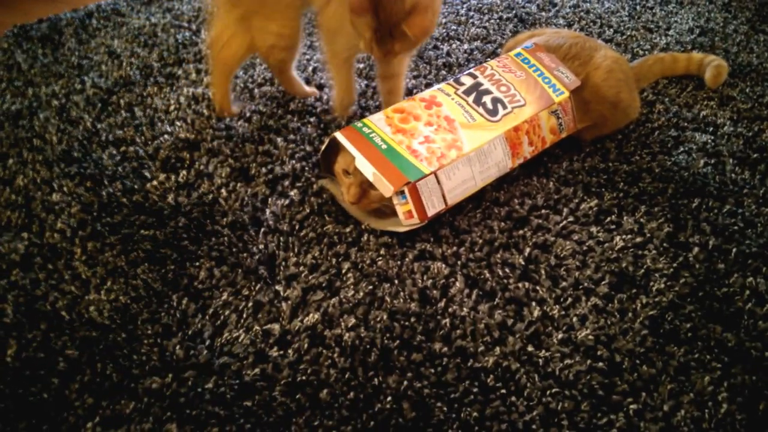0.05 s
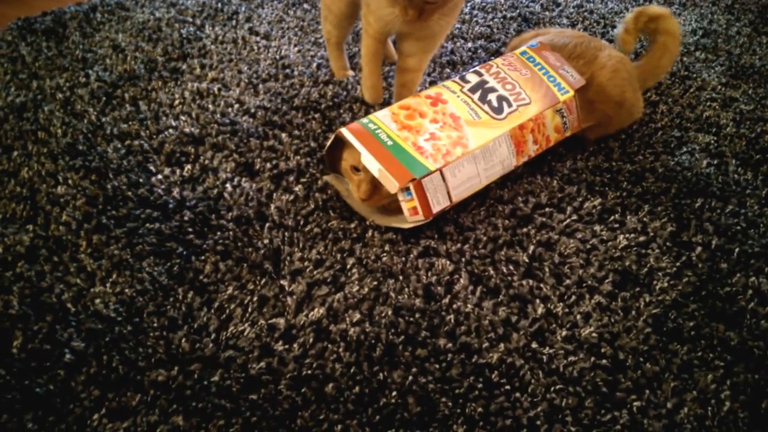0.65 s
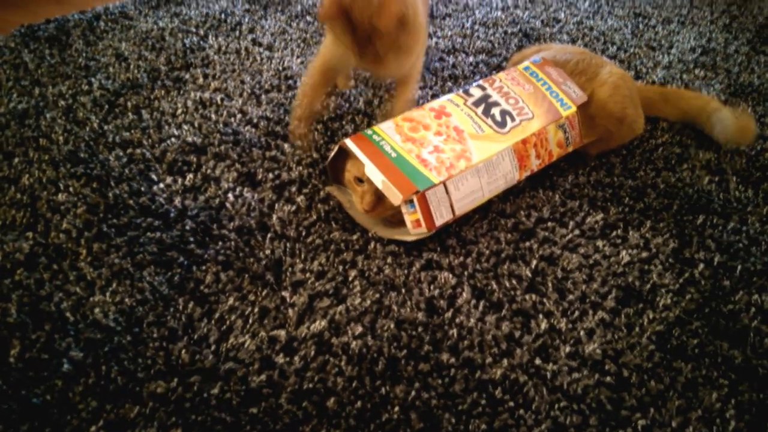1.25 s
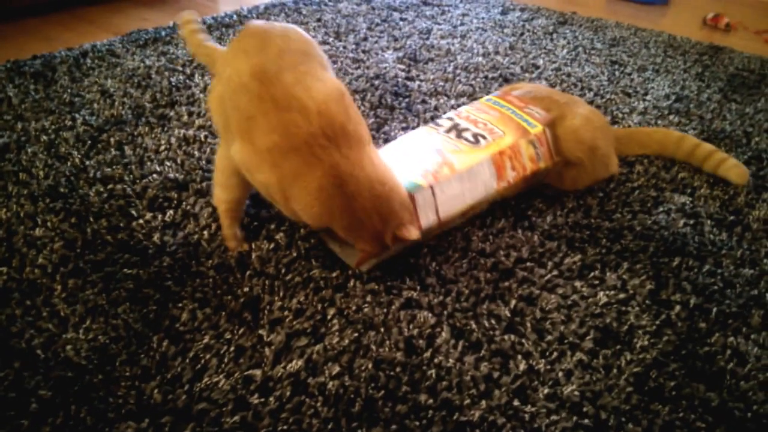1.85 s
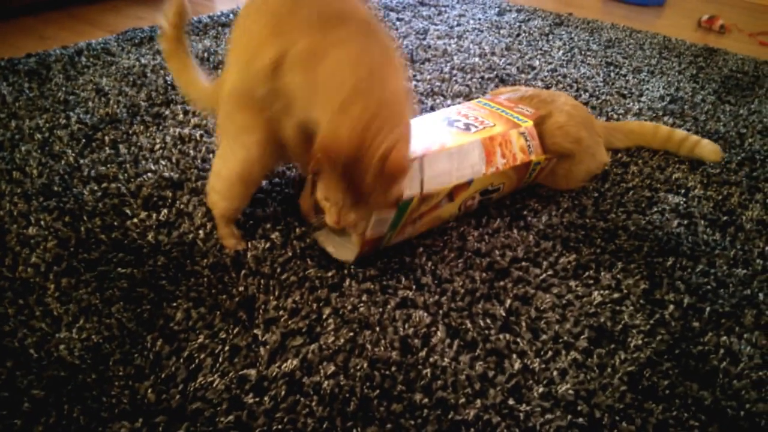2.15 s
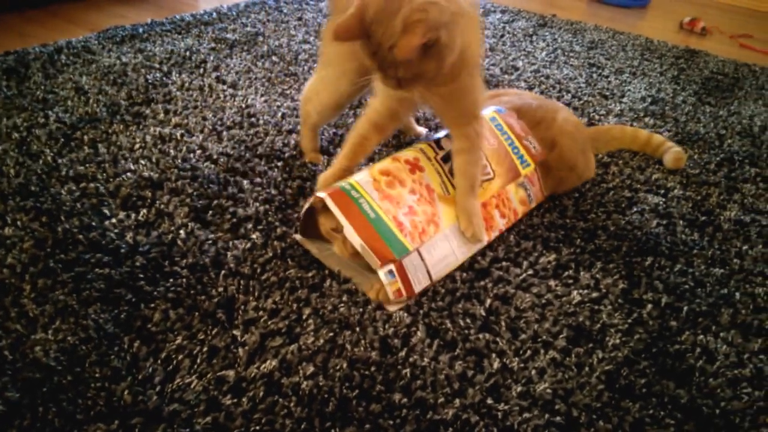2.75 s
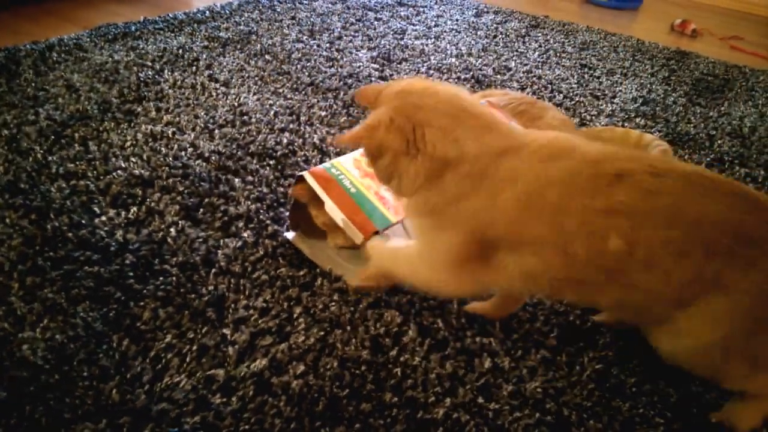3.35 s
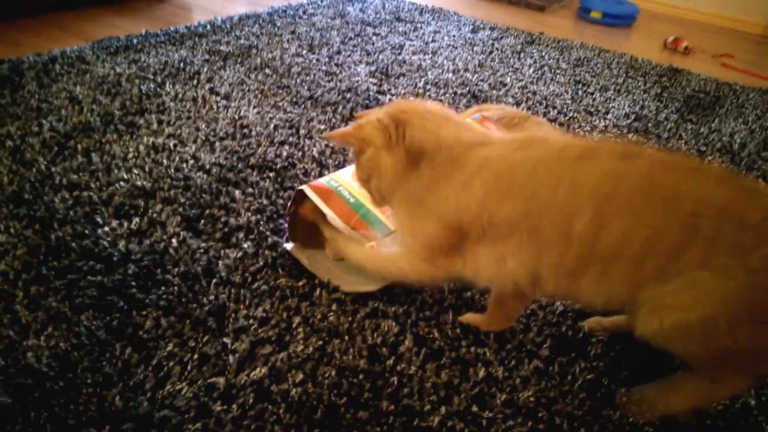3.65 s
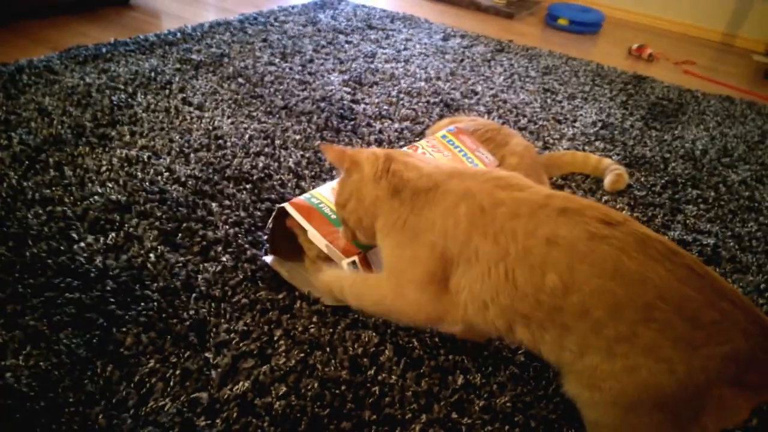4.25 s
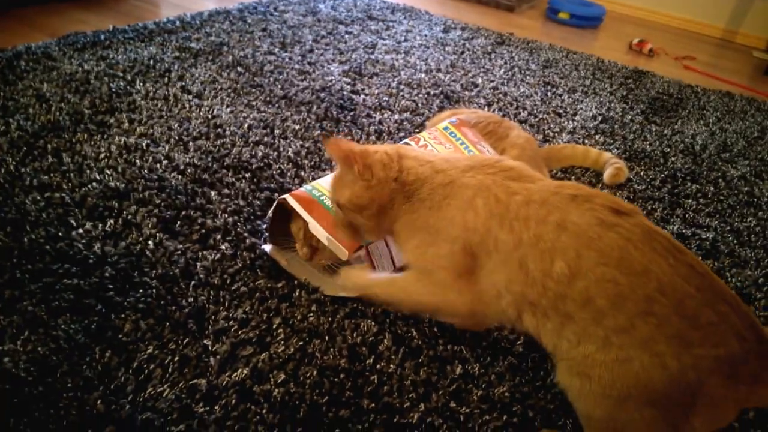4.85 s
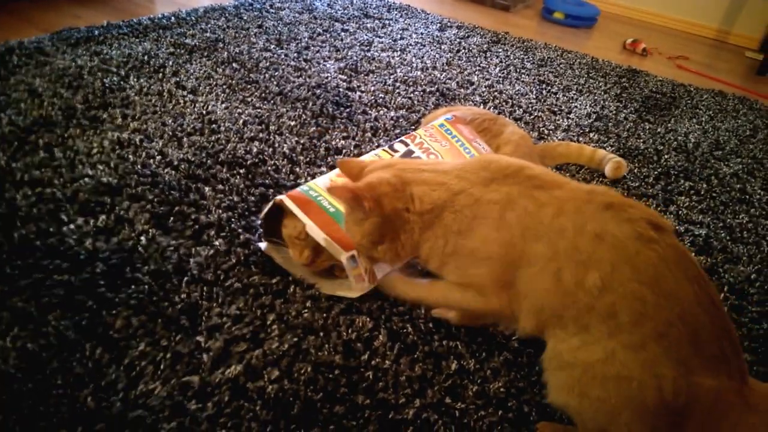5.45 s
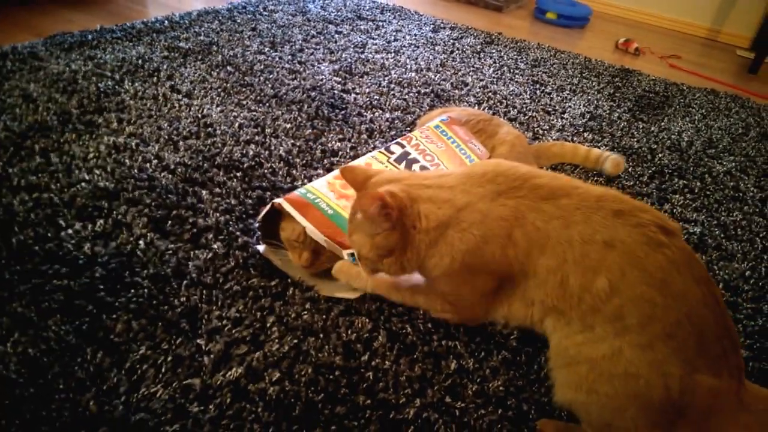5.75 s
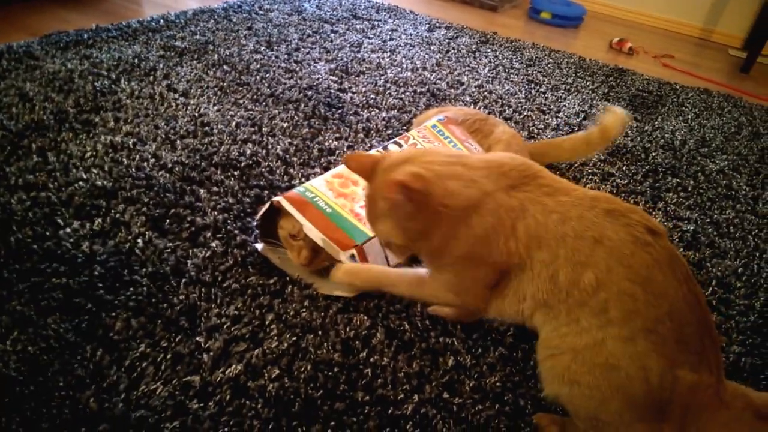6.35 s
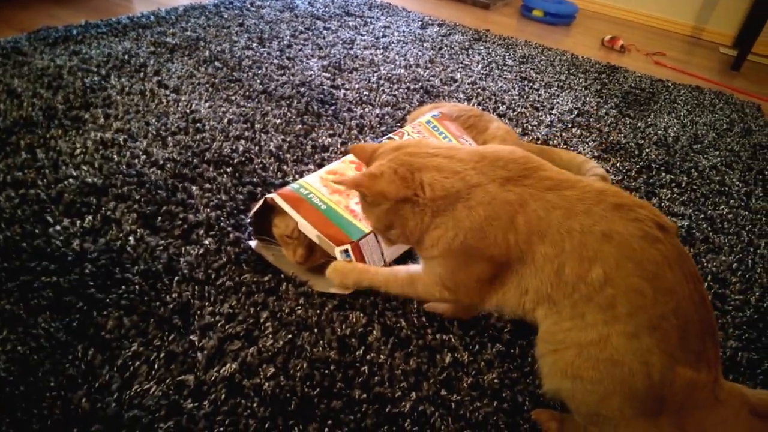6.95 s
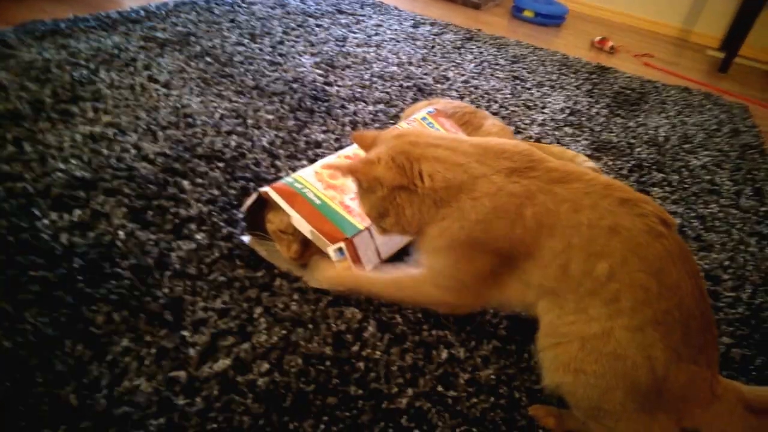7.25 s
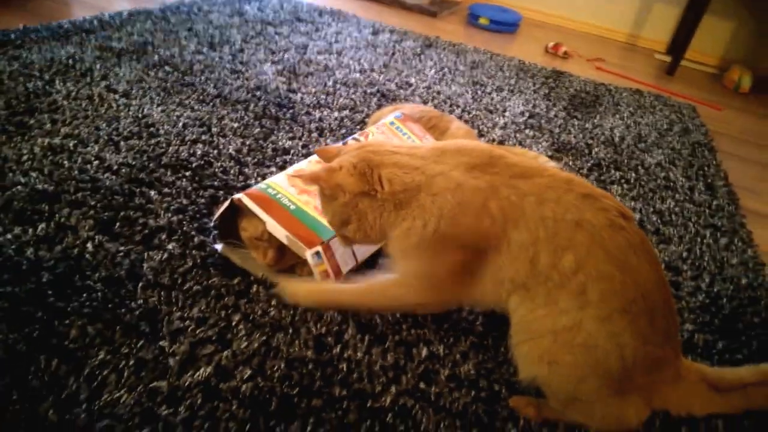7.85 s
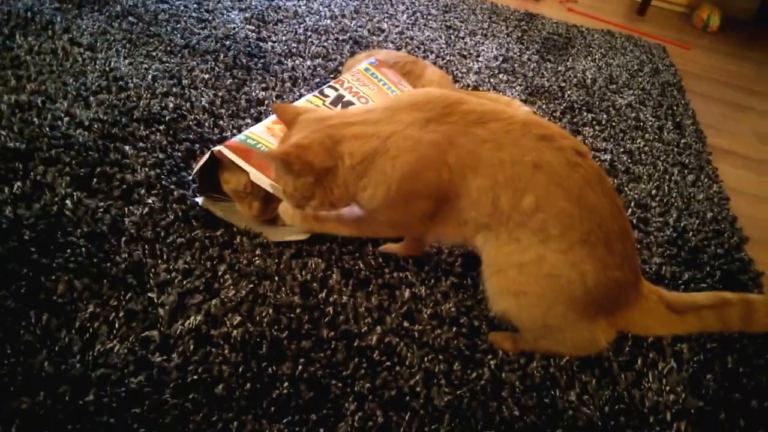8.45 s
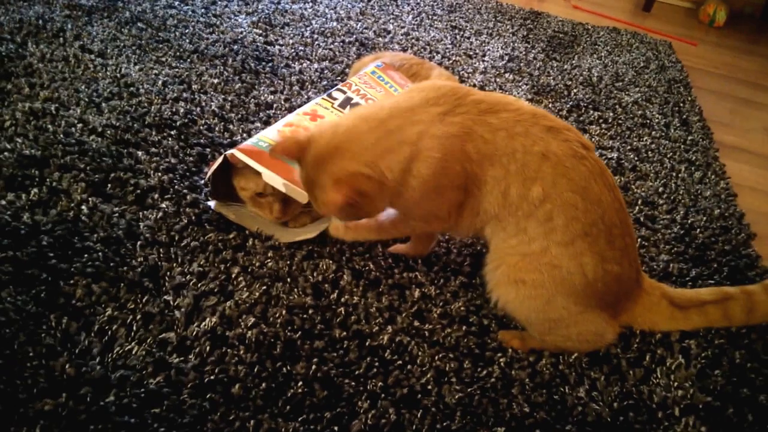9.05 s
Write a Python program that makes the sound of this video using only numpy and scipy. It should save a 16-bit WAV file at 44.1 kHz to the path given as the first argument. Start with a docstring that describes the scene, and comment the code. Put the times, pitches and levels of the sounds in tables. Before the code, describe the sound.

A faint, low appliance hum and a soft hiss of air run throughout in a living room. At about 1.4 seconds a kitten starts pawing a cardboard box, with hollow knocks and small cracks. The strongest come near 1.5 seconds, with a soft thud on the rug, and near 1.9 seconds. Fur brushes and claws scrape the card until about 3.5 seconds, among lighter taps and a sharper knock at 3.2. Around 3.7 to 4.3 seconds comes a flurry of knocks, flap flicks, scratches and soft thuds. The play then thins to separate flicks of the end flap, clearest near 5.6, 6.6 and 7.2 seconds, with faint scratches between. More flicks, a knock and a scrape come around 8 seconds, then light taps near 8.7 and 9.1. The sounds are close, with a short room echo.

```python
"""Two kittens play with a cardboard box on a thick rug in a living room.
Their paws knock and dent the box, so the air inside thumps, the panels ring and the creases crack.
They flick its end flap, scrape and prick the card with their claws, brush it with their fur
and land on the floor with soft thuds. The room adds a short echo.
Underneath, a household appliance hums steadily in a faint hiss of air."""
import sys
import numpy as np
from scipy import signal
from scipy.fft import rfft, irfft, next_fast_len
from scipy.io import wavfile

SR = 44100
rng = np.random.default_rng(int(sys.argv[2]) if len(sys.argv) > 2 else 0)


def wav_out(sig):
    """Save sig, one row per channel (or a flat mono array), as 16-bit PCM at SR to the path in sys.argv[1]."""
    wavfile.write(sys.argv[1], SR, np.round(np.clip(np.atleast_2d(sig).T, -1, 1) * 32767).astype(np.int16))


N = 405279

# Paw blows on the box. Each row: start in seconds, relative levels in dB of the hollow thump,
# the panel ring and the crease crack, number of touches.
PAW_KNOCKS = [(1.386, -39.5, -80, -78, 1), (1.405, -43, -52.5, -59, 2), (1.544, -26.5, -36.5, -40, 1),
              (1.674, -45, -54, -63, 1), (1.7506, -50.5, -48, -57.5, 3), (1.8547, -36.5, -35, -40, 1),
              (2.179, -51.5, -57, -59, 1), (2.3957, -48.5, -52, -60, 1), (2.4538, -58, -54.5, -64, 1),
              (2.5914, -38.5, -50, -56, 1), (2.667, -46.5, -65, -64, 1), (3.1706, -45.5, -37, -56, 1),
              (3.744, -41.5, -58, -61, 1), (3.9534, -39, -43, -47.5, 4), (4.021, -48, -56, -58, 1),
              (4.0711, -50, -55, -68, 1), (4.275, -51.5, -57, -69, 1), (5.3941, -59.5, -56, -80, 1),
              (8.0999, -45.5, -54.5, -66, 1), (8.7039, -56, -50, -66, 1)]
# Flicks of the end flap. Each row: start in seconds, relative level in dB.
FLAP_FLICKS = [(2.592, -54.5), (3.7441, -41.5), (3.8381, -55), (3.979, -40.5), (4.2522, -54),
               (4.3685, -55.5), (5.1295, -47.5), (5.3206, -56), (5.577, -39), (5.7626, -50.5),
               (6.605, -45.5), (6.7858, -56), (7.1794, -40.5), (7.3643, -55.5), (7.858, -43),
               (7.988, -46.5), (9.0875, -55)]
# Single claw strokes. Each row: middle in seconds, length in seconds, relative level in dB, pitch in Hz.
CLAW_STROKES = [(1.574, .047, -52.5, 3900), (1.747, .018, -50.5, 1807), (2.401, .049, -60, 1790),
                (2.84, .049, -67.5, 2440), (2.881, .045, -61.5, 2330), (2.992, .037, -58, 2380),
                (3.976, .077, -49, 2120), (4.291, .084, -60.5, 1930), (4.617, .32, -74.5, 1960),
                (5.03, .086, -66.5, 6500), (5.395, .028, -55, 1660), (6.58, .035, -64, 6500),
                (7.144, .12, -67.5, 1700), (7.684, .016, -57.5, 7040), (8.1, .28, -61.5, 1680),
                (8.514, .21, -71.5, 1910), (8.707, .022, -53, 1570)]
# Rubbing as a kitten climbs over the box. Each row: time in seconds, claw level in dB, fur level in dB.
CLIMB_LEVELS = [(.7, -98, -100), (1.03, -74, -97), (1.38, -89, -82), (1.41, -73, -55.5), (1.53, -84, -70),
                (1.67, -60, -61), (1.82, -64.5, -67), (2.03, -88, -75), (2.17, -76, -62.5),
                (2.27, -74, -67), (2.42, -68, -62.5), (2.6, -74, -65), (2.93, -76, -77), (3.1, -81, -78),
                (3.38, -77, -65), (3.7, -89, -85)]
# Claw tips pricking the card. Each row: start in seconds, relative level in dB.
CLAW_PRICKS = [(1.418, -64), (1.544, -63), (1.8545, -49), (3.9535, -56), (8.0996, -69)]
# A kitten landing on the rug. Each row: start in seconds, relative level in dB.
LANDINGS = [(1.544, -40.5), (3.038, -51), (3.961, -40), (3.982, -41.5), (8.10, -50.5)]

# The ways each part rings, called modes. Each row: pitch in Hz, width in Hz, relative level in dB.
HOLLOW_MODES = [(235, 170, 1.5), (350, 260, -1), (530, 260, -8)]  # the air in the box
PANEL_MODES = [(700, 400, -7), (1200, 450, -1), (1650, 520, 0), (2150, 700, 0), (2800, 900, -7)]
CREASE_MODES = [(3580, 910, 4), (5230, 2100, 5), (8450, 3800, -8)]
FLAP_MODES = [(310, 260, -4), (760, 200, -6), (1250, 260, -12), (1620, 280, -10), (2010, 260, -5),
              (2200, 520, 0), (2900, 600, -16), (3500, 800, -14)]
SNAP_MODES = [(4960, 1200, -25), (6450, 1600, 7)]  # a claw leaving the flap
ALL_ROUND_MODES = [(280, 260, 0), (720, 550, -3), (1350, 900, -1), (2150, 1400, 0), (3500, 2200, -3)]  # the card's modes from all directions, merged into broad humps
CLAW_TIP_MODES = [(10800, 1300, -6), (13300, 1800, -3)]  # a claw tip on the card's coating
FLOOR_MODES = [(149, 91, 0)]  # the floor under the rug

# Tone colours of fur, room echo and air. Each row: frequency in Hz, relative level in dB.
FUR_SPECTRUM = [(100, -27), (300, 9), (700, 7), (2000, 4), (5500, 0), (9000, -6), (13000, -9), (16000, -10)]
ECHO_SPECTRUM = [(100, 9), (240, 2), (600, 0.5), (1100, 0.5), (2000, -3.5), (3800, -4.5), (6000, -3.5),
                 (9000, -1), (14000, -10)]
AIR_SPECTRUM = [(25, -4), (50, -4), (100, 7.5), (170, 3), (280, 4), (450, -2.5), (700, -7), (1000, -7.5),
                (1200, -4), (1500, -7), (2200, -7.5), (3700, -10), (5200, -17), (10000, -20.5),
                (16000, -22.5)]
# How long the echo lasts. Each row: frequency in Hz, seconds to fade by 60 dB.
ECHO_FADE = [(150, .27), (500, .3), (1400, .26), (3700, .28), (9000, .2), (15000, .16)]
# Sound arriving from all sides. Each row: frequency in Hz, likeness of left and right (1 is identical).
STEREO_LIKENESS = [(100, 0.68), (300, 0.75), (640, 0.6), (1400, 0), (3000, 0), (16000, 0.063)]
# Left-right tilts. Each row: frequency in Hz, left minus right in dB.
BOX_TILT = [(200, 1.5), (700, -1.5), (1500, -3.5), (4500, 4.5), (8000, 5.5), (13000, 16)]  # sound coming straight from the box
MICROPHONE_TILT = [(60, -3.5), (700, -3.5), (1300, -3), (2400, -4.5), (4400, -6.5), (8000, -2.5),
                   (15000, -3.5)]  # sensitivity of the two microphones

TOUCH_GAP_S, TOUCH_LOSS_DB = .0108, 5.5  # a fumbling paw touches again, softer than it first hit
# Fur level at a typical stroke, and the share of a stroke's extra dB that the fur follows.
TYPICAL_STROKE_DB, STROKE_FUR_DB, FUR_FOLLOWS = -55.5, -59, 0.57
MOTOR_HZ, MAINS_HUM_HZ = 59.695, 119.98
MOTOR_DB, MAINS_HUM_DB = -54, -55
# Fainter appliance tones. Each row: pitch in Hz, level in dB.
APPLIANCE_WHINES = [(179.2, -74), (240, -88), (269.2, -76), (414, -79), (469, -80.5), (538.2, -74),
                    (1120, -82), (2148, -83.5), (2628, -90), (4177, -99), (4297, -88.5)]


def paw_knocks():
    """Paws thump the box's air, ring its panels and crack creases. Gives direct and wall-bound sound."""
    touches = [(s + k * TOUCH_GAP_S, *(np.array(levels_db) - TOUCH_LOSS_DB * (k > 0)))
               for s, *levels_db, count in PAW_KNOCKS for k in range(round(count))]
    starts, thump_db, panel_db, crack_db = np.transpose(touches)
    thumps = blows(zip(starts, thump_db), HOLLOW_MODES, buckle=.066, buckle_s=.0027, gain_db=-.5)
    cracks = blows(zip(starts, crack_db), CREASE_MODES, buckle=.2, buckle_s=.004, gain_db=-.5)
    panels = blows(zip(starts, panel_db), PANEL_MODES, buckle=.045, buckle_s=.004)
    spread = blows(zip(starts, panel_db), ALL_ROUND_MODES, buckle=.071, buckle_s=.0047)
    return thumps + cracks + panels, from_db(-5) * (thumps + cracks) + spread


def flap_flicks():
    """The flap snaps off a claw and springs back. Gives direct and wall-bound sound."""
    swing = blows(FLAP_FLICKS, FLAP_MODES, buckle=.032, buckle_s=.012)
    snap = blows(FLAP_FLICKS, SNAP_MODES, buckle=.12, buckle_s=.0016, gain_db=-17)
    spread = blows(FLAP_FLICKS, ALL_ROUND_MODES, buckle=.06, buckle_s=.0063, gain_db=-4)
    return swing + snap, spread + from_db(-6.5) * swing + from_db(-6) * snap


def blows(rows, modes, buckle, buckle_s, gain_db=0):
    """Each blow rings the modes with a push, then tiny fading slips as the surface buckles."""
    track = np.zeros(N)
    t = np.arange(2048) / SR
    for start, db in rows:
        force = (t == 0) + buckle * rng.standard_normal(len(t)) * np.exp(-t / buckle_s)
        spot_db = rng.standard_normal(len(modes))  # each spot rings a little differently
        ring = sum((-1) ** k * from_db(mode_db + spot_db[k]) * soft_ring(force, hz, width)
                   for k, (hz, width, mode_db) in enumerate(modes))
        attack_level = np.sqrt(np.mean(ring[t < .006] ** 2))
        add(track, start, from_db(db + gain_db) * ring / attack_level)
    return track


def soft_ring(x, hz, width):
    """Soft card takes a moment to get moving, so the resonance acts twice."""
    return resonate(resonate(x, hz, width), hz, width)


def resonate(x, hz, width):
    """One resonance: it passes its own pitch at full strength and weakens the rest."""
    r = np.exp(-np.pi * width / SR)
    feedback = [1, -2 * r * np.cos(2 * np.pi * hz / SR), r * r]
    return signal.lfilter(np.array([1, 0, -1]) * (1 - r * r) / 2, feedback, x)


def claws_and_fur(slips_per_s, uneven_db, rubbing_hz):
    """Claws stick and slip over the card, in long rubbing and single strokes; fur adds a fine hiss."""
    slips = (rng.random(N) < slips_per_s / SR) * rng.standard_normal(N)
    slips *= from_db(uneven_db * drift(per_s=150))
    claw_gain, fur_gain = climbing_gains()
    scrape = claw_gain * rasp(slips, rubbing_hz)
    for middle, length, db, hz in CLAW_STROKES:
        start = max(middle - length / 2, 0)
        swell = np.hanning(int(length * SR))
        grains = slips[int(start * SR):][:len(swell)]
        add(scrape, start, from_db(db) * swell[:len(grains)] * rasp(grains, hz))
        add(fur_gain, start, from_db(STROKE_FUR_DB + FUR_FOLLOWS * (db - TYPICAL_STROKE_DB)) * swell)
    fur_hiss = unit_level(coloured(rng.standard_normal(N) + 5 * slips, FUR_SPECTRUM))
    return scrape + fur_gain * fur_hiss


def climbing_gains():
    """How strongly claws and fur rub while a kitten climbs on the box; zero before and after."""
    times, *levels_db = np.transpose(CLIMB_LEVELS)
    t = np.arange(N) / SR
    return [from_db(np.interp(t, times, db)) * (t > times[0]) * (t < times[-1]) for db in levels_db]


def rasp(slips, hz):
    """Slips ring the card under the claw and, faintly, the hollow of the box."""
    return unit_level(soft_ring(slips, hz, width=hz / 2) + .12 * resonate(slips, hz=540, width=460))


def claw_pricks():
    """Claw tips prick the coated card with tiny, high ticks."""
    return blows(CLAW_PRICKS, CLAW_TIP_MODES, buckle=.13, buckle_s=.0013, gain_db=2.5)


def floor_thuds():
    """A kitten's weight lands on the rug and shakes the floor under it."""
    return blows(LANDINGS, FLOOR_MODES, buckle=.0076, buckle_s=.0015)


def room_echo(x, gain_db, build_s):
    """Walls and furniture send back a blur of echoes that dies away band by band."""
    t = np.arange(SR // 2) / SR
    edges_hz = np.geomspace(80, 16000, 22)
    tail = 0
    for low, high in zip(edges_hz, edges_hz[1:]):
        hz = np.sqrt(low * high)
        band_pass = signal.butter(2, [low, high], "band", fs=SR, output="sos")
        band = signal.sosfilt(band_pass, diffuse_noise(SR))[:, -len(t):]
        fade = from_db(-60 * t / at_hz(ECHO_FADE, hz))
        band = unit_level(band * fade * (1 - np.exp(-t / build_s)))
        width_gain = np.sqrt(2 * (high - low) / SR / len(t))  # wider bands carry more energy
        tail = tail + band * from_db(at_hz(ECHO_SPECTRUM, hz)) * width_gain
    return from_db(gain_db) * signal.fftconvolve(x[None], tail, axes=1)[:, :N]


def appliance():
    """The motor runs just under mains speed, beside the magnetic hum and some faint whines."""
    hum = tone(MOTOR_HZ, MOTOR_DB, waver=.02) + tone(MAINS_HUM_HZ, MAINS_HUM_DB, waver=.044)
    return hum + sum(tone(hz, db, waver=.44) for hz, db in APPLIANCE_WHINES)


def tone(hz, db, waver):
    """A steady tone whose phase wanders by about `waver` radians."""
    phase = 2 * np.pi * (hz * np.arange(N) / SR + rng.random())
    return np.sqrt(2) * from_db(db) * np.sin(phase + waver * drift(per_s=4))


def still_air():
    """A faint, low hiss comes from all around the room."""
    noise = diffuse_noise(next_fast_len(N))[:, :N]
    return from_db(-61.5) * unit_level(coloured(noise, AIR_SPECTRUM))


def diffuse_noise(size):
    """White noise from all sides: left and right are alike only for long, low waves."""
    mid, side = rfft(rng.standard_normal((2, size)))
    alike = at_hz(STEREO_LIKENESS, np.arange(len(mid)) * SR / size)
    return irfft(np.sqrt((1 + alike) / 2) * mid + np.sqrt((1 - alike) / 2) * side * [[1], [-1]], size)


def placed(x, lead_ms):
    """Direct sound reaches the left microphone a little earlier."""
    return np.array([x, np.roll(x, round(lead_ms * SR / 1000))])


def tilted(pair, tilt):
    """Give half of a left-right tilt to the left side and the opposite half to the right."""
    return np.array([coloured(pair[0], tilt, share=.5), coloured(pair[1], tilt, share=-.5)])


def coloured(x, spectrum, share=1):
    """Turn each frequency up or down by a share of the table's dB."""
    size = next_fast_len(x.shape[-1] + 2048)
    hz = np.arange(size // 2 + 1) * SR / size
    return irfft(rfft(x, size) * from_db(share * at_hz(spectrum, hz)), size)[..., :x.shape[-1]]


def drift(per_s):
    """A random wander of about size 1, gliding to a new value per_s times a second."""
    values = rng.standard_normal(int(N / SR * per_s) + 2)
    return unit_level(np.interp(np.arange(N) / SR * per_s, np.arange(len(values)), values))


def add(track, start_s, sound):
    """Mix a sound into the track at its start time."""
    start = max(round(start_s * SR), 0)
    track[start:start + len(sound)] += sound[:N - start]


def at_hz(table, hz):
    """Read between a table's rows, with octaves evenly spaced."""
    row_hz, values = np.transpose(table)
    return np.interp(np.log(np.maximum(hz, 1)), np.log(row_hz), values)


def unit_level(x):
    """Scale a signal to an average (rms) level of 1."""
    return x / np.sqrt(np.mean(x ** 2) + 1e-20)


def from_db(db):
    """Turn decibels into a gain."""
    return 10 ** (np.asarray(db) / 20)


def scene():
    """The box is heard directly and through the room, over still air and the hum."""
    rubbing = claws_and_fur(slips_per_s=2600, uneven_db=5, rubbing_hz=1830)
    rustle = rubbing + claw_pricks()
    thuds = floor_thuds()
    box, box_to_walls = paw_knocks()
    flap, flap_to_walls = flap_flicks()
    direct = tilted(placed(box + rustle + thuds, lead_ms=.04) + placed(flap, lead_ms=.12), BOX_TILT)
    echoes = room_echo(box_to_walls + flap_to_walls + from_db(-.5) * rustle, gain_db=.03, build_s=.0073)
    return direct + echoes + still_air() + appliance()


def record(dry):
    """The right microphone is the more sensitive; treble above 15850 Hz is cut."""
    low_pass = signal.ellip(10, .1, 70, 15850, fs=SR, output="sos")
    return signal.sosfilt(low_pass, tilted(dry, MICROPHONE_TILT))


dry = scene()
out = record(dry)
wav_out(out)
```